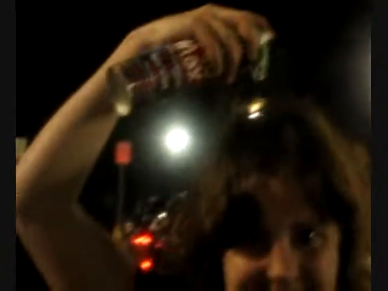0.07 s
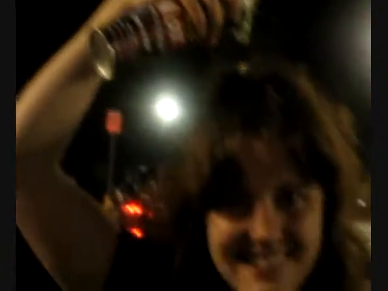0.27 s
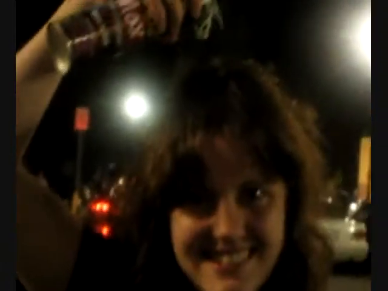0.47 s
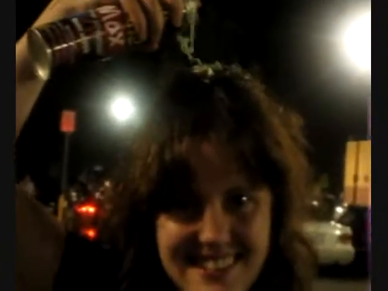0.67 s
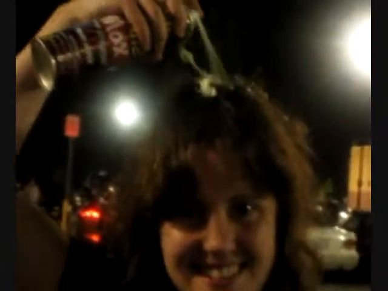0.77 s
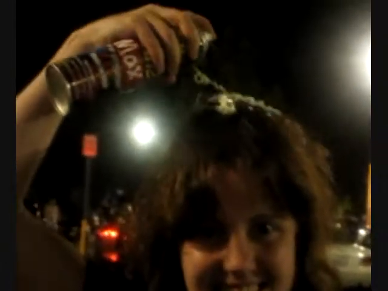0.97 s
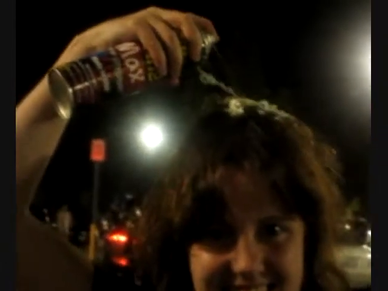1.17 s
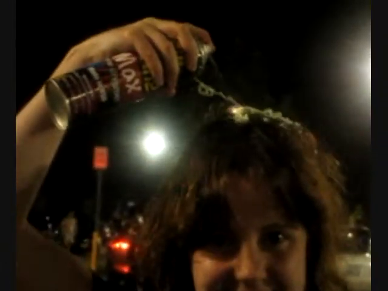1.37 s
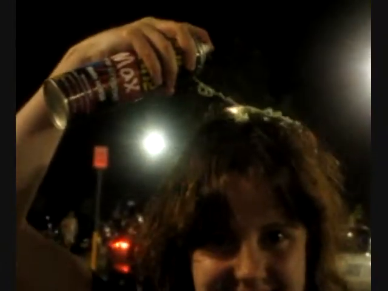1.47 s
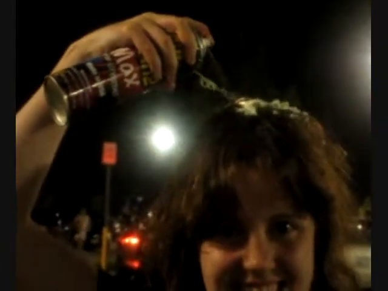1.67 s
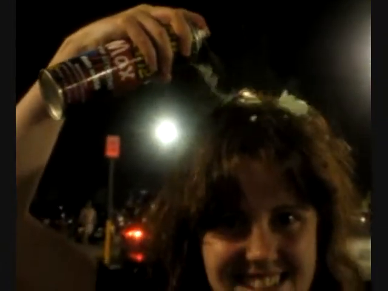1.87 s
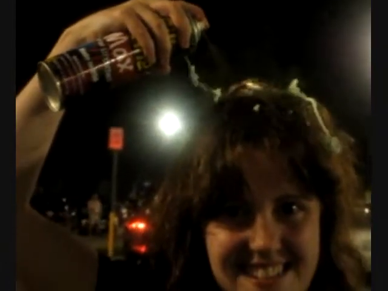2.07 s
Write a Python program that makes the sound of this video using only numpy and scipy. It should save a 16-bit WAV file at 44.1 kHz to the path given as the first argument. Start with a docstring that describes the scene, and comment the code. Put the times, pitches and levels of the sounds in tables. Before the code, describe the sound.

An aerosol can sprays foam, close and dry, outdoors. Soft distant traffic alone until 0.24 seconds, when the valve opens with small gas puffs and a tiny tick. Sharp, loud wet spits cluster from 0.38 to 0.5, with a few more near 0.73. The crackling rush swells unevenly until about 0.95, then becomes a steady, fine, bright hiss with faint handling thumps, continuing to the 2.1-second end.

```python
"""An aerosol can sprays a string of foam close to the microphone, outdoors at night.
Its valve opens with puffs of gas and sharp spits; a wet crackling rush builds, then settles to a fine bright hiss.
Jet and foam are random grains over smooth noise, filtered and driven by one uneven flow; puffs are gated
noise, spits are filter impulse responses and the valve's tick is a decaying sine.
Filtered noise gives distant traffic and a light breeze; short low sines give the hand on the microphone."""
import sys
import numpy as np
from scipy import signal
from scipy.fft import rfft, irfft
from scipy.io import wavfile

SR = 44100
rng = np.random.default_rng(int(sys.argv[2]) if len(sys.argv) > 2 else 0)


def digitize_waveform(pressure):
    """Quantize a signal to 16-bit integers and store it at the path in sys.argv[1].

    Rows of a 2-D input are taken as channels; values are limited to [-1, 1].
    """
    field = np.atleast_2d(pressure).T
    bounded = np.clip(field, -1, 1)
    quanta = np.round(bounded * 32767).astype(np.int16)
    wavfile.write(sys.argv[1], SR, quanta)


N = 94021

# Level contours over time; columns: time_s, level_db
# distant tyre roar as heard at the output, its level sinking under the spray
TRAFFIC_LEVEL = [(0, -32.5), (0.12, -33), (0.28, -31.5), (0.43, -33.5), (0.47, -37.5), (0.65, -37.5),
                 (0.72, -33.5), (0.86, -35.5), (0.94, -29.5), (0.99, -44.5), (1.55, -48.5), (1.8, -43),
                 (2.13, -50.5)]
# moving air on the microphone
BREEZE_LEVEL = [(0, -53), (0.7, -63), (0.94, -38), (0.975, -55), (1.25, -63), (1.35, -47), (1.6, -48),
                (1.87, -54), (1.93, -65), (2.13, -64)]
# gas jet, before its overall gain JET_GAIN_DB
JET_LEVEL = [(0.24, -40), (0.28, -34), (0.305, -32), (0.333, -29), (0.36, -39), (0.40, -31.5), (0.43, -33),
             (0.48, -33.5), (0.51, -22.5), (0.57, -27), (0.62, -25), (0.70, -32), (0.745, -26),
             (0.80, -33.5), (0.885, -20.5), (0.93, -40), (0.957, -21.5), (1.02, -23), (1.12, -24.5),
             (1.3, -24.5), (1.53, -24.5), (1.62, -26), (1.75, -26), (2.13, -26.5)]
# whistling band of the jet
WHISTLE_LEVEL = [(0.24, -27), (0.45, -55), (0.6, -50), (0.75, -25.5), (0.85, -42), (0.94, -24),
                 (1.0, -32.5), (1.3, -31), (1.45, -29.5), (1.68, -32.5), (1.85, -27), (2.13, -27.5)]
# wet foam tearing at the nozzle
FOAM_LEVEL = [(0.24, -36), (0.33, -32.5), (0.40, -31.5), (0.43, -24), (0.47, -29.5), (0.56, -25),
              (0.65, -25.5), (0.70, -22), (0.75, -20), (0.81, -18.5), (0.86, -26.5), (0.91, -25),
              (0.945, -20), (0.975, -35), (1.02, -47), (1.13, -39), (1.19, -28.5), (1.24, -43),
              (1.29, -30.5), (1.45, -31.5), (1.6, -38), (1.75, -31.5), (2.13, -30)]

# Spectral shapes, overall level arbitrary; columns: frequency_hz, relative_db
# tyre roar
TRAFFIC_SPECTRUM = [(25, -8), (55, -2.5), (90, -11), (165, -5.5), (250, -10), (420, -9.5), (590, -9.5),
                    (700, -4.5), (850, -1.5), (1030, 0), (1300, -3.5), (1600, -8), (2100, -12.5),
                    (2700, -17.5), (3400, -19), (4200, -24), (5500, -27), (7500, -31), (8700, -28),
                    (9700, -31.5), (12500, -35)]
# low rumble of moving air
BREEZE_SPECTRUM = [(20, 0), (70, -1), (160, -8), (250, -13), (400, -29), (2000, -66)]
# gas jet
JET_SPECTRUM = [(150, -32), (450, -26.5), (900, -21), (2100, -20), (3250, -14.5), (3700, -16), (4400, -14),
                (4950, -12), (5500, -15.5), (6400, -15), (7200, -17.5), (7800, -2), (8350, -1.5),
                (9000, -4), (9700, -5), (11000, -2), (11700, 2.5), (12300, 3), (13500, -9.5)]
# whistling band
WHISTLE_SPECTRUM = [(2000, -28.5), (5000, -17.5), (6000, -7.5), (7200, -5), (8000, -4.5), (8500, 1.5),
                    (9200, -11.5), (11000, -1), (13500, -64)]
# tearing foam
FOAM_SPECTRUM = [(100, -14), (500, -19.5), (850, -18), (1250, -9), (2050, -7.5), (2600, -5), (3250, -1.5),
                 (3550, -5), (3900, -0.5), (4450, -4.5), (5050, 0), (5550, -7.5), (6500, -3.5), (7200, -8),
                 (7750, 4.5), (8600, 2), (9700, 0.5), (10800, -3), (12300, -21), (13500, -28)]
# nozzle resonances, heard in spits and puffs
NOZZLE_SPECTRUM = [(200, -29), (1000, -15), (3200, -10.5), (5000, -11), (6500, -13.5), (7500, -4),
                   (8400, 1.5), (9300, -1.5), (10200, -2), (11700, 1.5), (12400, 0.5), (14000, -43)]

# Soft handling thumps; columns: centre_s, envelope_peak_db, half_length_s (to 1/e), pitch_hz
THUMPS = [(1.458, -30.5, 0.0049, 75), (1.655, -40, 0.0069, 90), (1.785, -32, 0.0066, 97),
          (1.85, -31, 0.0031, 131), (1.877, -39.5, .008, 114), (2.034, -40, 0.011, 55)]
# Bubbles bursting at the nozzle; columns: start_s, peak_db, body_db (added below BODY_EDGE_HZ)
BUBBLE_SPITS = [(0.255, -16, 6), (0.2825, -18, 0), (0.313, -13, -12), (0.318, -23, 0), (0.3345, -16, -13),
                (0.3762, 2.5, 4), (0.3819, -4.5, -1), (0.391, -10, 5), (0.4049, -3.5, 3), (0.4193, -6, 2),
                (0.4214, -4, 15), (0.4286, -6.5, 2), (0.441, 0.5, 5), (0.4519, -2, -3), (0.4556, -8, 7),
                (0.4677, -2.5, 7), (0.4744, -5, 2), (0.4866, 0.5, 3), (0.4964, -9, 6), (0.5392, -10, 18.5),
                (0.7185, -1, 4), (0.745, -1, 15), (0.7516, -5, -2)]
# Pockets of escaping gas; columns: start_s, level_db, length_s (to 1/e)
GAS_PUFFS = [(0.2383, -12.5, 0.0015), (0.2488, -18, .0035), (0.2595, -30, 0.0029), (0.266, -21, .0015),
             (0.3469, -18.5, 0.0036), (0.350, -19, 0.0053), (0.3555, -14, 0.0014), (0.3615, -20, 0.0053),
             (0.417, -18, 0.0011), (0.4335, -18, 0.006), (0.94, -16.5, 0.0063)]
# Near echoes from hand and head; columns: delay_s, level_db
NEAR_ECHOES = [(.0011, -27), (.0026, -25.5), (.0071, -15)]

# Valve opening and the unevenness of the flow: rates in new values per second, spreads in dB
OPEN_S, OPEN_RISE_S = 0.2375, 0.0061
FLUTTER_PER_S, FLUTTER_DB = 500, 0.86
SPUTTER_DB, SETTLE_S = 2.5, 0.14  # extra flutter at the opening, and its decay time
SURGE_PER_S, SURGE_DB = 45, 0.74
GAS_FLICKER_PER_S, GAS_FLICKER_DB = 180, 1.28

# Grains: rate once fully crowded, scale of the random size, level of the smooth noise beneath
JET_GRAINS_PER_S, JET_GRAIN_SPREAD_DB, JET_SMOOTH_DB = 6000, 6, -0.5
FOAM_GRAINS_PER_S, FOAM_GRAIN_SPREAD_DB, FOAM_SMOOTH_DB = 3500, 3.5, -2.5
WHISTLE_GRAINS_PER_S = 10000
FIRST_GRAIN_SHARE, THICKEN_S = 0.061, 0.66  # initial share of the rate; time to gain one full rate
JET_GAIN_DB = 2.5

BODY_EDGE_HZ = 6500
SPIT_TAIL_DB, SPIT_TAIL_S = -15, 0.0005  # gas behind each spit, relative to the spit's peak
TICK_S, TICK_HZ, TICK_DB, TICK_DECAY_S = 0.2941, 2300, -15.5, 0.0011
TOP_HZ = 12550  # upper edge of the recorder's band


def undb(db):
    """Level to amplitude: 20 dB is a factor of ten."""
    return 10 ** (np.asarray(db) / 20)


def unit(x):
    """Normalisation to unit rms amplitude."""
    return x / np.sqrt(np.mean(x ** 2))


def fader(rows):
    """Amplitude envelope, interpolated linearly in decibels between (time_s, level_db) points."""
    times_s, levels_db = np.array(rows).T
    return undb(np.interp(np.arange(N) / SR, times_s, levels_db))


def colour(x, points):
    """Minimum-phase filtering: folding the cepstrum makes a causal response from a magnitude curve."""
    hz, db = np.array(points).T
    size = 4096
    grid_hz = np.maximum(np.arange(size // 2 + 1) * SR / size, 1)
    curve_db = np.interp(np.log(grid_hz), np.log(hz), db)
    cepstrum = irfft(np.log(undb(curve_db)))
    cepstrum[1:size // 2] *= 2
    cepstrum[size // 2 + 1:] = 0
    response = irfft(np.exp(rfft(cepstrum)))
    return signal.fftconvolve(x, response)[:len(x)]


def noise(points):
    """Broadband noise: white noise shaped by a spectrum, at unit rms."""
    return unit(colour(rng.standard_normal(N), points))


def walk(rate):
    """Slow random modulation of unit rms: `rate` new values a second, joined by straight lines."""
    position = np.arange(N) * rate / SR
    return unit(np.interp(position, np.arange(N), rng.standard_normal(N)))


def droplets(age, rate, spread_db, smooth_db):
    """Shot noise: random impulses, sparse at first and then crowding, over growing smooth turbulence."""
    density = np.clip(FIRST_GRAIN_SHARE + age / THICKEN_S, 0.01, 1)
    sizes = undb(spread_db * np.minimum(rng.exponential(size=N), 3))
    signs = np.sign(rng.standard_normal(N))
    clicks = (rng.random(N) < rate * density / SR) * sizes * signs
    grains = unit(clicks / np.sqrt(density))  # fewer grains are each stronger
    turbulence = undb(smooth_db) * np.sqrt(density) * rng.standard_normal(N)
    return grains + turbulence


def traffic():
    """Superposition of many tyre sources: a distant road merges into fluctuating broadband noise."""
    return fader(TRAFFIC_LEVEL) * undb(1.14 * walk(25.2)) * noise(TRAFFIC_SPECTRUM)


def breeze():
    """Wind pressure on the microphone: fluctuating noise concentrated at low frequency."""
    return fader(BREEZE_LEVEL) * undb(0.83 * walk(11.4)) * noise(BREEZE_SPECTRUM)


def handling(t):
    """Contact excitation: a nudge by the hand gives a cycle or two of low tone in a Gaussian envelope."""
    out = np.zeros(N)
    for centre_s, peak_db, half_length_s, pitch_hz in THUMPS:
        offset = t - centre_s
        envelope = np.exp(-(offset / half_length_s) ** 2)
        out += undb(peak_db) * envelope * np.sin(2 * np.pi * pitch_hz * offset)
    return out


def valve_tick(t):
    """Damped free oscillation: the valve ticks, ringing for a few cycles."""
    age = np.maximum(t - TICK_S, 0)
    return undb(TICK_DB) * np.exp(-age / TICK_DECAY_S) * np.sin(2 * np.pi * TICK_HZ * age)


def spits():
    """Impulse response: each bursting bubble excites the nozzle's resonances once."""
    out = np.zeros(N)
    kick = signal.unit_impulse(1024)
    for start_s, peak_db, body_db in BUBBLE_SPITS:
        spectrum = [(hz, db + body_db * (hz < BODY_EDGE_HZ)) for hz, db in NOZZLE_SPECTRUM]
        ring = colour(kick, spectrum)
        start = int(start_s * SR)
        out[start:start + len(ring)] += undb(peak_db) * ring / np.abs(ring).max()
    return out


def puffs(t):
    """Transient efflux: gas escapes alone or behind a spit, starting abruptly and fading as a Gaussian."""
    tails = [(start_s, db + SPIT_TAIL_DB, SPIT_TAIL_S) for start_s, db, _ in BUBBLE_SPITS]
    gate = np.zeros(N)
    for start_s, level_db, length_s in list(GAS_PUFFS) + tails:
        gate += undb(level_db) * (t >= start_s) * np.exp(-((t - start_s) / length_s) ** 2)
    return gate * noise(NOZZLE_SPECTRUM)


def spray(t):
    """Common modulation: gas hiss, whistling band and crackling foam share one uneven nozzle flow."""
    age = np.maximum(t - OPEN_S, 0)
    flutter_db = FLUTTER_DB + SPUTTER_DB * np.exp(-age / SETTLE_S)
    uneven_db = flutter_db * walk(FLUTTER_PER_S) + SURGE_DB * walk(SURGE_PER_S)
    flow = np.minimum(age / OPEN_RISE_S, 1) * undb(uneven_db)

    gas_grains = droplets(age, JET_GRAINS_PER_S, JET_GRAIN_SPREAD_DB, JET_SMOOTH_DB)
    flicker = undb(JET_GAIN_DB + GAS_FLICKER_DB * walk(GAS_FLICKER_PER_S))
    gas = unit(colour(gas_grains, JET_SPECTRUM)) * flicker

    whistle_grains = droplets(age, WHISTLE_GRAINS_PER_S, JET_GRAIN_SPREAD_DB, JET_SMOOTH_DB)
    whistle = unit(colour(whistle_grains, WHISTLE_SPECTRUM))

    foam_grains = droplets(age, FOAM_GRAINS_PER_S, FOAM_GRAIN_SPREAD_DB, FOAM_SMOOTH_DB)
    foam = unit(colour(foam_grains, FOAM_SPECTRUM))
    return flow * (fader(JET_LEVEL) * gas + fader(WHISTLE_LEVEL) * whistle + fader(FOAM_LEVEL) * foam)


def scene():
    """Superposition: background, handling and the can with its near echoes, alike in both channels."""
    t = np.arange(N) / SR
    background = traffic() + breeze() + handling(t)
    can = valve_tick(t) + spits() + puffs(t) + spray(t)
    near = can.copy()
    for delay_s, level_db in NEAR_ECHOES:
        near += undb(level_db) * np.interp(t - delay_s, t, can, left=0)
    return np.tile(background + near, (2, 1))


def record(dry):
    """Saturation and band limiting: the recorder rounds the loudest peaks and cuts the top steeply."""
    ceiling = 1.0
    rounded = ceiling * np.tanh(dry / ceiling)
    taps = signal.firwin(401, TOP_HZ, window=("kaiser", 8), fs=SR)
    return signal.fftconvolve(rounded, taps[None], mode="same", axes=1)


dry = scene()
out = record(dry)
digitize_waveform(out)
```